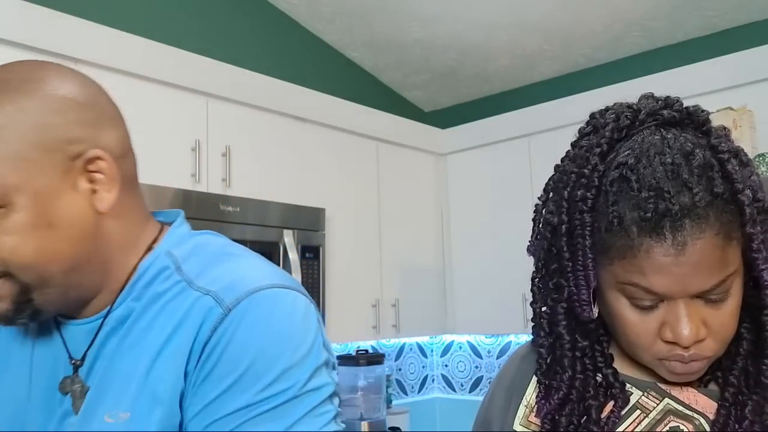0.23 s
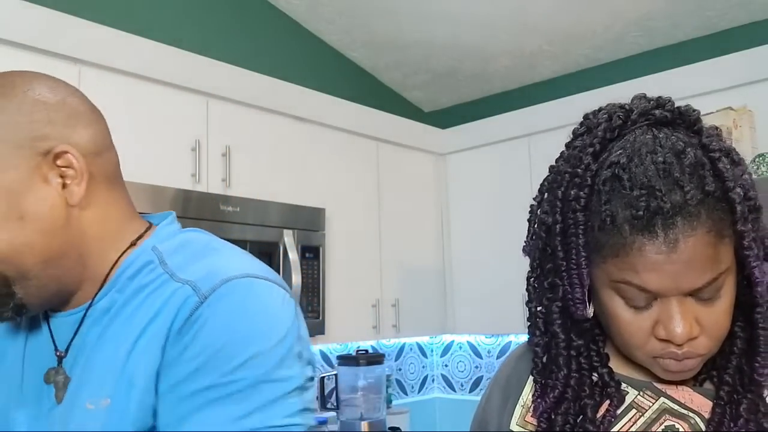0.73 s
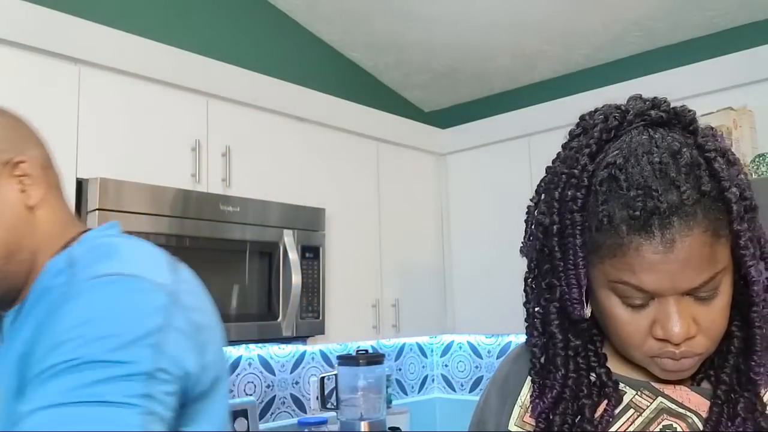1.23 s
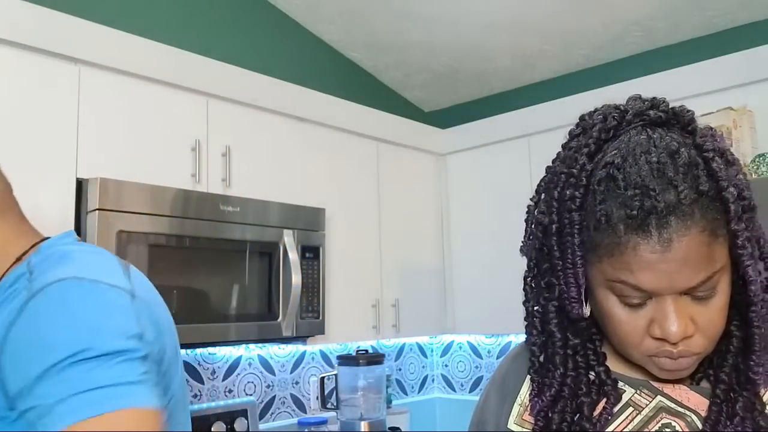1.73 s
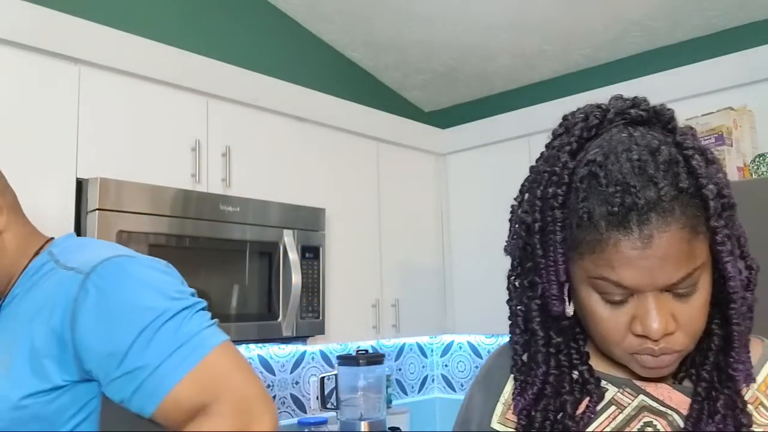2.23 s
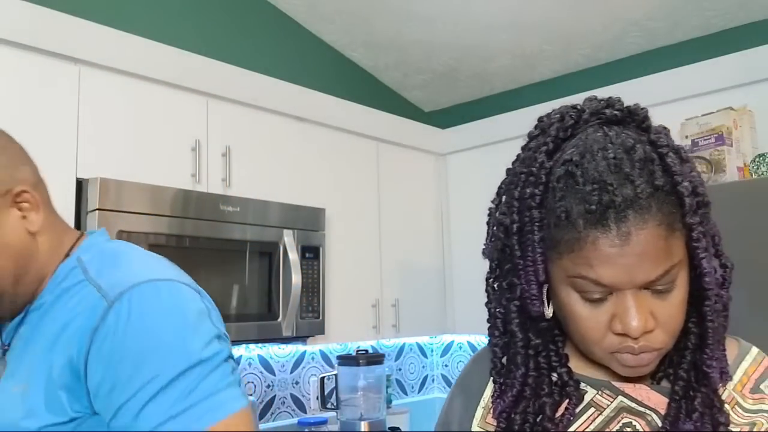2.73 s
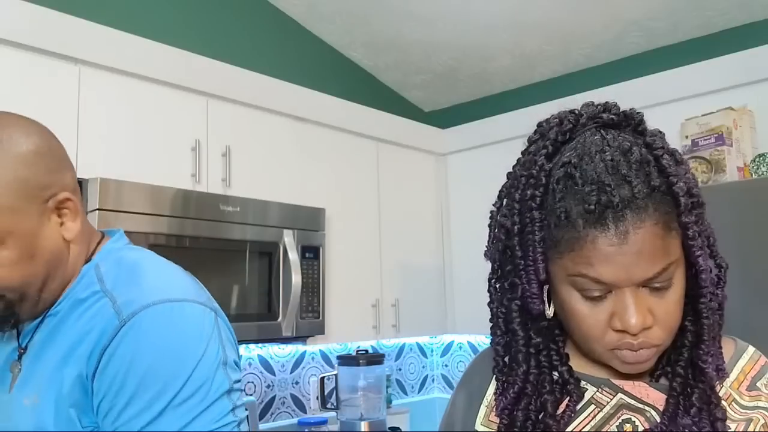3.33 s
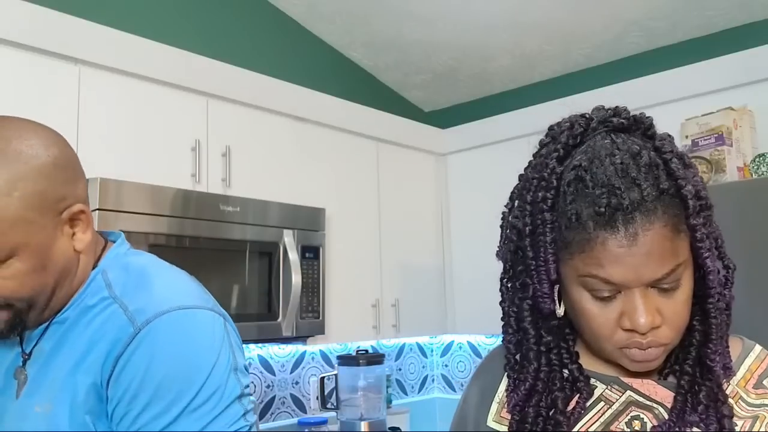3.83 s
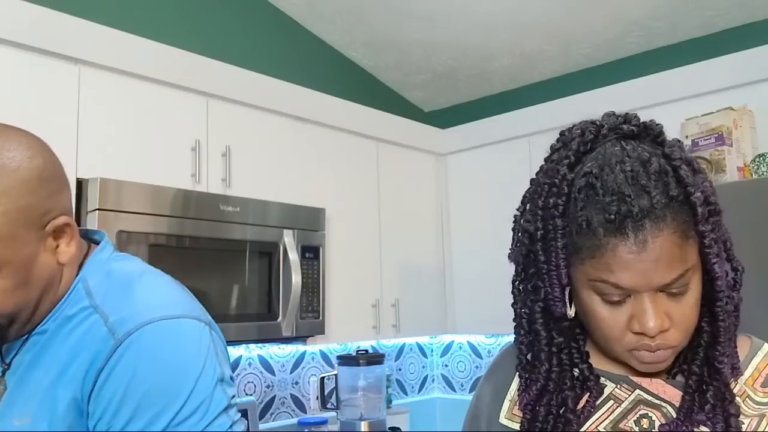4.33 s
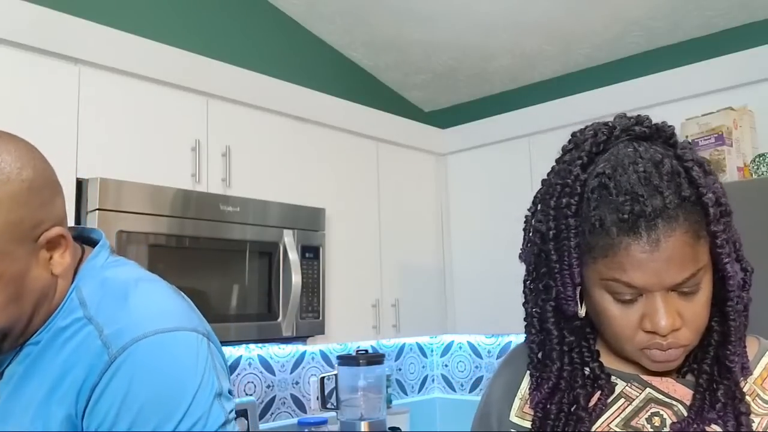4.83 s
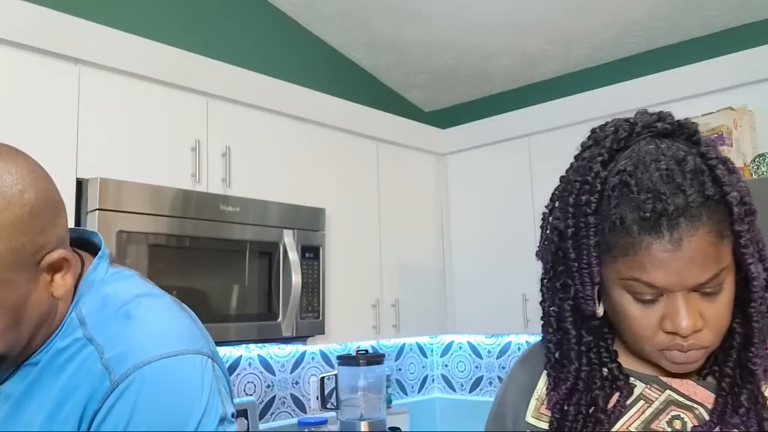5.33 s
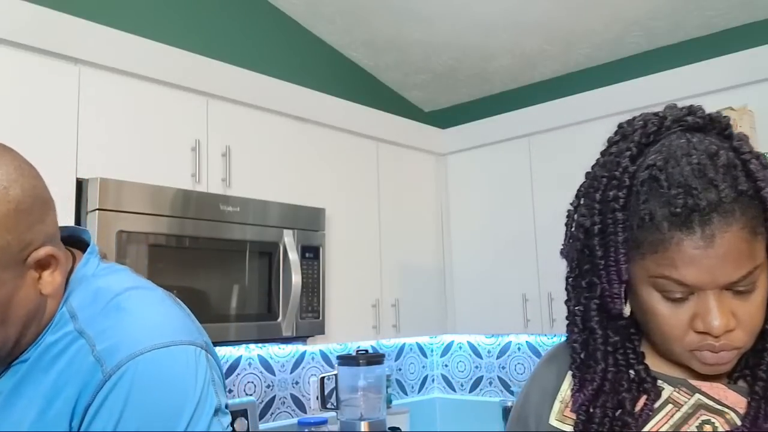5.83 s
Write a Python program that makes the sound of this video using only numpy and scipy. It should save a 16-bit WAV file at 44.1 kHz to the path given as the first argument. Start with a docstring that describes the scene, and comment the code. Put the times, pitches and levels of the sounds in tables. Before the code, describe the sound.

A close microphone in a reverberant kitchen, with a soft low appliance hum throughout. At about 0.25 s a knife is picked up: a quick cluster of small wooden knocks, a steely scuff and a light glassy clink, fading into faint hand rustle from 0.6 to 1.1 s. At 1.13 s a thin metal tray bangs down loudly on the counter, clattering and shimmering, with a smaller bounce at 1.38 s before it is damped. From 2.13 s a blade slides through firm rind with bright metallic hiss and a little crunch, hitting the board hard around 2.25 s and again at 2.32 s; a thin high ring lingers to about 2.8 s, with faint bumps. Very faint dish taps come at 2.9 and 3.6-3.8 s. From 4.6 s, quiet short sawing strokes rasp, growing slightly stronger after 5.3 s, with dull fruit bumps on the board, clearest at 5.8 s, until 6 s.

```python
"""A knife is picked up, a thin metal tray bangs down and rattles, then the blade slides through firm rind onto the board.
Later the blade saws in short strokes and fruit bumps the board; glassy dishes are tapped, appliances hum softly.
Blows ring decaying modes of board, tray and dishes; random clicks keep tray and steel ringing.
Coloured clicks make hiss and crunch, filtered noise the hum; a noise tail gives the room."""
import sys
import numpy as np
from scipy import signal
from scipy.fft import rfft, irfft
from scipy.io import wavfile

SR = 44100
rng = np.random.default_rng(int(sys.argv[2]) if len(sys.argv) > 2 else 0)


def to_linear_factor(level_db):
    """Convert decibel levels (scalar or array-like) to linear amplitude factors."""
    exponent = np.asarray(level_db, float) / 20
    return 10 ** exponent


def pcm_store(signal):
    """Save signal as 16-bit PCM."""
    levels = np.round(np.clip(np.atleast_2d(signal), -1, 1) * 32767)
    wavfile.write(sys.argv[1], SR, levels.astype(np.int16).T)


N = 268745


def level_in_time(rows):
    """A (time, level) table read at every sample; silent outside the rows."""
    time_s, level_db = np.transpose(rows)
    return np.interp(np.arange(N) / SR, time_s, level_db, -150, -150)


def at_hz(points, hz):
    """A table read on a log-frequency axis."""
    table_hz, value = np.transpose(points)
    return np.interp(np.log(hz + 1), np.log(table_hz), value)


def rms_one(x):
    """Scales to rms 1."""
    return x / np.sqrt(np.mean(x ** 2) + 1e-20)


def colour(x, spectrum):
    """Filters a noise by the spectrum; rms 1."""
    hz = np.arange(len(x) // 2 + 1) * SR / len(x)
    return rms_one(irfft(rfft(x) * to_linear_factor(at_hz(spectrum, hz)), len(x)))


def drift(rate_hz):
    """Slow random curve of rms 1: noise through a two-pole low-pass, computed every 40 samples."""
    r = np.exp(-2 * np.pi * rate_hz * 40 / SR)
    noise = rng.standard_normal(N // 40 + 2002)
    slow = signal.lfilter([1], [1, -2 * r, r * r], noise)[2000:]
    return np.interp(np.arange(N) / 40, np.arange(len(slow)), rms_one(slow))


def grains(per_s, spread_db):
    """Random clicks of uneven size and either sign; rms 1."""
    size_db = spread_db * np.minimum(rng.exponential(1, N), 5)
    clicks = to_linear_factor(size_db) * rng.choice([-1, 1], N)
    return rms_one(clicks * (rng.random(N) < per_s / SR))


def ring(force, hz, t60_s):
    """Resonator: a unit click sets off a decaying sine of height 1."""
    r, w = to_linear_factor(-60 / (t60_s * SR)), 2 * np.pi * hz / SR
    return signal.lfilter([0, np.sin(w)], [1, -2 * r * np.cos(w), r * r], force + 1e-18)


def strike(out, start_s, modes, peak_db, rise_s):
    """Adds one blow on a set of modes; a contact that takes time lets them swell."""
    hz, level_db, t60_s = np.transpose(modes)[:, :, None]
    start = round(start_s * SR)
    t = np.arange(min(N - start, int(SR * t60_s.max()))) / SR
    sign = (-1.) ** np.arange(len(hz))[:, None]
    partials = sign * to_linear_factor(level_db - 60 * t / t60_s) * np.sin(2 * np.pi * hz * t)
    sound = np.sum(partials, axis=0) * (1 - np.exp(-t / rise_s))
    sound *= to_linear_factor(peak_db) / np.abs(sound).max()
    return out + np.pad(sound, (start, N - start - len(t)))


def favour(hz, centre_hz, boost_db, octaves):
    """The place of a blow lifts the modes around one pitch."""
    return boost_db * np.exp(-(np.log2(hz / centre_hz) / octaves) ** 2)


def damped(from_s, t60_s):
    """Gain of the extra decay once a ringing thing is held or at rest."""
    return to_linear_factor(-60 * np.maximum(np.arange(N) / SR - from_s, 0) / t60_s)


def swell(loudest_s, rise_s, level_db, t60_s, hold_s=0):
    """Gain of one contact: a climb of 25 dB, even in dB, from the first touch, a hold, an even decay."""
    t = np.arange(N) / SR - loudest_s
    climb_db = 25 * np.minimum(t, 0) / max(rise_s, .001)
    decay_db = 60 * np.maximum(t - hold_s, 0) / max(t60_s, .02)
    return (t > -rise_s) * to_linear_factor(level_db + climb_db - decay_db)


def together(gains):
    """Contacts add by power."""
    return np.sqrt(np.sum(np.square(gains), axis=0))


def knocks():
    """Hard contacts reach the upper board modes, heavy ones shake the counter's lowest; faint bumps land softly."""
    # board and counter contacts: (time [s], peak before a 1.5 dB cut [dB], hardness [dB/octave],
    # weight on the counter [dB], favoured pitch [Hz])
    contacts = [(0.246, -22, 0.5, -3, 222), (0.268, -24.5, -10, -11.5, 226), (0.284, -23.5, 1, -15, 232),
                (0.299, -27.5, -3.5, 1.5, 234), (0.486, -41.5, -12, -19, 218), (1.132, -2, -4, -1.5, 194),
                (1.142, -9, 5, 6, 237), (1.382, -14.5, -5, -14, 330), (1.458, -24, -3, 2.5, 234),
                (1.507, -31, -5, 0, 268), (2.129, -26, 0.5, -10, 259), (2.183, -28, 11, -4, 460),
                (2.246, -4.5, 8, -6, 756), (2.253, -5.5, 4, -12, 357), (2.272, -13.5, 6, 0, 263),
                (2.289, -25, 9, -21, 455), (2.324, -17.5, 5.2, -1, 362), (2.808, -35, 0.5, -0.5, 463),
                (2.835, -37.5, 1, -2, 420), (2.861, -33, -1.5, -3.5, 268), (5.358, -35.5, 5, 10, 343),
                (5.699, -32, 1, 0, 249), (5.738, -37, -2.5, 7, 277), (5.821, -21.5, -1.5, -3.5, 448),
                (5.889, -32.5, 0, 3.5, 244), (5.905, -34.5, 3.5, 0, 460), (5.949, -42, -1, -3, 232),
                (6.012, -34.5, -4, 7, 232)]
    # board modes: (frequency [Hz], level [dB], t60 before stretching [s])
    board_modes = [(68, -21, 0.11), (122, -4.5, 0.12), (238.2, -2, 0.091), (288, -2, 0.064),
                   (357, -1.5, 0.052), (459.1, -1.5, .04), (577, -8, 0.053), (701, -7.5, .03),
                   (831.3, -12.5, 0.034), (960, -6, 0.017), (1174, -11, .025), (1335, -13.5, 0.018),
                   (1504, -15, 0.015), (1840, -18.5, 0.0143), (2340, -19.5, 0.01164)]
    out, (hz, level_db, t60_s) = np.zeros(N), np.transpose(board_modes)
    chances = rng.standard_normal((len(contacts), len(board_modes)))
    for (start_s, peak_db, hard_db, weight_db, centre_hz), chance in zip(contacts, chances):
        stretch = 1.3 * to_linear_factor(.25 * weight_db)      # heavy contacts ring longer
        blow_db = level_db + hard_db * np.log2(hz / 300) + weight_db * (hz < 200) + 1.7 * chance
        blow_db += favour(hz, centre_hz, boost_db=9.8, octaves=.3)
        rise_s = .0006 * to_linear_factor(-.5 * peak_db)
        out = strike(out, start_s, np.transpose([hz, blow_db, t60_s * stretch]), peak_db - 1.5, rise_s)
    return out


def tray():
    """Blows ring the sheet metal; while it chatters on the counter dense clicks keep feeding its modes."""
    # blows: (time [s], peak [dB], favoured pitch [Hz])
    blows = [(1.132, -18.5, 280), (1.141, -10.5, 1168), (1.16, -15.5, 2140), (1.189, -26, 600),
             (1.2, -18, 1168), (1.383, -28, 340)]
    # tray modes: (frequency [Hz], level [dB], t60 before capping [s])
    tray_modes = [(126, -14, 0.29), (226, -4, 0.9), (343, 1.5, 0.98), (490, -16.5, 0.49), (553, -6, 0.24),
                  (705, -18, 0.25), (1000, -29, 5.0), (967, -19, 0.17), (1037, -18.5, 0.48),
                  (1168, -11.5, 0.24), (1325, -15, 0.6), (1678, -10, 0.24), (1776, -14, 0.73),
                  (2047, -9.5, 0.65), (2135, -8, 0.9), (2186, -10, 0.65), (2236, -13, 0.68),
                  (2333, -19, 0.99), (2564, -15, 0.15), (2620, -30.5, 5.0), (3420, -30.5, 1.5),
                  (4030, -25.5, 2.2), (3962, -26, 3.0), (4043, -18.5, 0.5), (4807, -23, 0.6),
                  (5350, -39.5, 5.0)]
    # chatter of the sheet: (loudest [s], rise [s], level [dB], hold [s], t60 [s])
    chatter_row = (1.165, .03, -27.5, .09, .5)
    # buzz of the rim while it touches: (loudest [s], rise [s], level [dB], hold [s], t60 [s])
    rim_row = (1.18, .035, -36.5, .075, .12)
    # unpitched clatter: (loudest [s], rise [s], level [dB], hold [s], t60 [s])
    clatter_row = (1.154, .02, -33, .07, .9)
    # the base takes the first bounce: (loudest [s], rise [s], level [dB], t60 [s])
    landing_row = (1.15, .012, -15.5, .12)
    # clatter spectrum: (frequency [Hz], level [dB])
    clatter_spectrum = [(600, -24), (1000, -6), (1500, -3), (2200, -5), (2900, -2), (3800, -7), (5000, -4),
                        (9000, -20), (14000, -40)]
    rest_s, rest_t60_s, settle_t60_s = 1.41, 0.13, .6      # the tray comes to rest and stops ringing

    out, (hz, level_db, t60_s) = np.zeros(N), np.transpose(tray_modes)
    t60_s = np.minimum(t60_s, np.minimum(.9, 330 / hz + 0.098))      # upper modes lose more to the counter
    chances = rng.standard_normal((len(blows), len(tray_modes)))
    for (start_s, peak_db, centre_hz), chance in zip(blows, chances):
        blow_db = level_db - 1.7 * np.log2(hz / 300) + 2 * chance
        blow_db += favour(hz, centre_hz, boost_db=18.0, octaves=0.13)
        out = strike(out, start_s, np.transpose([hz, blow_db, t60_s]), peak_db, rise_s=0.006)
    wobble = to_linear_factor(1.6 * drift(29.99))      # the tray rocks, its ring flutters

    clicks = grains(2500, 3.5)
    rings = np.array([to_linear_factor(db) * rms_one(ring(clicks, f, .08 if f < 3500 else .035))
                      for f, db in zip(hz, level_db)])
    base, sheet, rim = [rms_one(rings[(hz > low) & (hz <= high)].sum(axis=0))
                        for low, high in [(900, 1400), (1400, 3500), (3500, 7000)]]
    shake, buzz, scatter = [swell(loudest_s, rise_s, db, dying_s, hold_s)
                            for loudest_s, rise_s, db, hold_s, dying_s in (chatter_row, rim_row, clatter_row)]
    base_gain = together([to_linear_factor(-5) * shake, swell(*landing_row)])
    chatter = shake * sheet + buzz * rim + base_gain * base
    clatter = scatter * damped(rest_s, settle_t60_s) * colour(clicks, clatter_spectrum)
    return (out * wobble + chatter) * damped(rest_s, rest_t60_s) + clatter


def blade():
    """Friction grains keep the steel's modes ringing; each flutters as the blade turns in the room."""
    # steel dragged over an edge, push by push: (loudest [s], rise [s], ringing drive [dB], t60 [s],
    # crunch re drive [dB])
    slides = [(.44, .04, -68, 0.36, 1.5), (2.134, .009, -27, .22, -8), (2.195, .05, -27, 0.28, -11),
              (2.25, .08, -25, .4, -10), (2.305, .07, -18.5, 0.21, -20), (2.36, .1, -30, .35, -9),
              (2.45, .1, -43, .3, -14)]
    # steel modes, only relative levels count: (frequency [Hz], level [dB])
    steel_modes = [(3677, -42), (4420, -46), (5426, -50), (5674, -45), (5825, -43), (7822, -51),
                   (8220, -42), (8452, -45), (9405, -53), (9695, -51), (9825, -43), (10099, -43),
                   (10277, -50), (10519, -47), (11149, -53), (11682, -37), (11763, -44), (11956, -45),
                   (12258, -49), (12452, -49), (12645, -48), (12893, -49), (13098, -49), (13248, -49),
                   (13469, -50), (13598, -51), (13819, -49), (14093, -49), (14616, -49), (14939, -50)]
    # a touch sets one free mode singing: (time [s], peak before flutter [dB], frequency [Hz], t60 [s])
    pings = [(.425, -64.5, 4440, 0.38), (.44, -68, 3661, .3), (.65, -81, 2700, 2.5),
             (2.133, -39, 6966, .15), (2.27, -41, 4421, .3), (2.395, -39, 4425, 0.47),
             (2.51, -41.5, 4425, 0.37), (2.66, -62, 4425, .8), (2.78, -64.5, 4425, 0.57),
             (4.587, -76, 8700, .3)]
    # friction hiss spectrum: (frequency [Hz], level [dB])
    hiss_spectrum = [(1470, -41), (2500, -14), (3100, -24.5), (3620, -1), (3940, -10), (4570, -0.5),
                     (5170, -11.5), (5760, -3), (7430, -12), (8350, -1), (9020, -15.5), (9740, -7.5),
                     (11500, -2), (13500, 3), (15800, 2)]
    # rind crunch spectrum: (frequency [Hz], level [dB])
    crunch_spectrum = [(350, -33), (600, -4.5), (901, -2.5), (1230, -6), (2500, -18), (2700, -18),
                       (3300, -20), (4290, -42.5), (7260, -120)]
    hiss_db, cycles_to_60_db = -1.5, 680      # hiss re drive; cycles until a mode has lost 60 dB

    pushes = [swell(loudest_s, rise_s, db, t60_s) * to_linear_factor(np.array([[0], [hiss_db], [crunch_db]]))
              for loudest_s, rise_s, db, t60_s, crunch_db in slides]
    drive, hiss, crunch = together(pushes) * to_linear_factor(2.0 * drift(30))
    friction = grains(12000, 2.5)
    top_db = max(db for _, db in steel_modes)
    ringing = 0
    for hz, level_db in steel_modes:
        t60_s = cycles_to_60_db / hz
        steady = np.sqrt(4 * np.log(1000) / (t60_s * SR))      # steady rubbing gives rms 1
        flutter = to_linear_factor(2.5 * drift(18))
        ringing = ringing + to_linear_factor(level_db - top_db - 8.0) * steady * flutter * ring(drive * friction, hz, t60_s)
    singing = np.zeros(N)
    for start_s, peak_db, hz, t60_s in pings:
        singing = strike(singing, start_s, [(hz, 0, t60_s)], peak_db, rise_s=.008)
    singing = singing * to_linear_factor(3.1 * drift(34))
    rind = colour(grains(5000, 2.5), crunch_spectrum)
    return ringing + singing + hiss * colour(friction, hiss_spectrum) + crunch * rind


def rubbing():
    """Fine grains hiss, coarser ones crunch in the rind; after a scuff the top dies first, the crunch last."""
    # sudden scuffs of steel, tray and fruit: (time [s], hiss before a 3 dB cut [dB], hiss t60 [s],
    # top re hiss [dB], crunch re uncut hiss [dB])
    scuff_rows = [(.247, -37, 0.31, -4.5, -7), (.345, -52, 0.34, -4, -10), (.375, -54, .1, -9, -10),
                  (.43, -63, 0.35, 8, 9), (.488, -57.5, .08, -14, 6), (.624, -59.5, .1, -8, -14),
                  (.681, -61, .1, -6, -8), (.975, -66, 0.34, -4, -3), (1.073, -64, 0.21, -6, -20),
                  (1.134, -27.5, 0.074, -4.5, -10), (1.15, -38, 0.49, -12, -4), (1.318, -36, 0.21, 0, -12),
                  (1.36, -47, .2, 5, -10), (1.385, -37, .36, 5, -8), (1.625, -64, .1, 2, -10),
                  (2.825, -65.5, .2, -2.5, 7), (2.9, -64, .45, 6, 3), (4.585, -82, .3, 12.5, -15),
                  (5.335, -65.5, .1, 0, 9), (5.993, -53.5, .1, 3, -1)]
    # sawing strokes in the rind: (full pressure [s], hold [s], hiss before a 3 dB cut [dB],
    # top re hiss [dB], crunch re uncut hiss [dB])
    stroke_rows = [(2.5, .13, -62, -20, -12), (2.68, .1, -75, -8, -4), (2.801, 0.1, -76, -1, 13.5),
                   (4.66, .03, -76.5, 13, -15), (4.74, .04, -78, 13, -4), (4.82, .04, -86, -9, 10),
                   (4.95, .09, -74.5, 14.5, -2), (4.988, 0.062, -71, 12.5, 2), (5.04, .045, -66, 0, 2.5),
                   (5.349, 0.049, -59, 5.5, 6), (5.65, .02, -73.5, 4.5, -3.5), (5.687, .055, -62.5, 6.5, 5),
                   (5.8, .15, -75, -10, 9.5), (6.013, .02, -57, 6, 1.5), (6.045, .05, -61, -6, 4)]
    # a hand moves over the counter: (time [s], level before the hiss's 3 dB cut [dB])
    rustle_rows = [(.62, -74), (.72, -70), (.8, -73), (.86, -72), (.92, -78), (.98, -72), (1.04, -76),
                   (1.12, -75)]
    # hiss spectrum: (frequency [Hz], level [dB])
    hiss_spectrum = [(2470, -35), (4200, -6.5), (4470, -2), (5300, 2), (6730, 1.5), (8140, 4.5),
                     (8890, -1.5), (10800, 2), (11500, -4.5), (15000, -30), (22000, -120)]
    # spectrum of the top of the hiss: (frequency [Hz], level [dB])
    top_spectrum = [(6470, -30), (11000, -3), (11400, -2.5), (12400, -5), (15200, -4), (15800, -4)]
    # dull crunch spectrum: (frequency [Hz], level [dB])
    crunch_spectrum = [(350, -33), (600, 1.5), (862, -12), (1000, -6), (1500, -7), (1810, -4),
                       (2290, -13.5), (2830, -12), (3080, -17), (3380, -15.5), (4500, -18.5), (5850, -41.5),
                       (9900, -120)]
    scuff_rise_s, stroke_rise_s, stroke_t60_s = .004, .03, .2
    after_db, after_t60_s = -14, 1.4      # wet fibres go on crackling after a stroke

    scuffs = [[swell(start_s, scuff_rise_s, db, t60_s),
               swell(start_s, scuff_rise_s, db + top_db, t60_s * .85),
               swell(start_s, scuff_rise_s, db + crunch_db, t60_s * 2)]
              for start_s, db, t60_s, top_db, crunch_db in scuff_rows]
    strokes = []
    for full_s, hold_s, db, top_db, crunch_db in stroke_rows:
        gain = swell(full_s, stroke_rise_s, db, stroke_t60_s, hold_s)
        gain = gain + swell(full_s, stroke_rise_s, db + after_db, after_t60_s, hold_s)
        strokes.append(gain * to_linear_factor(np.array([[0], [top_db], [crunch_db]])))
    rustle_db = level_in_time(rustle_rows) + 1.5 * drift(12)
    rustle = to_linear_factor(rustle_db + np.array([[0], [-4], [0.0]]))
    hiss, top, crunch = together([*scuffs, *strokes, rustle])
    fine, coarse = grains(14000, 1.1), grains(5000, 2.5)
    hissing = hiss * colour(fine, hiss_spectrum) + top * colour(fine, top_spectrum)
    crunching = crunch * colour(coarse, crunch_spectrum)
    return to_linear_factor(2.2 * drift(22) - 3.0) * hissing + to_linear_factor(1.5 * drift(20)) * crunching


def dish():
    """Two partials, at a pitch of their own from piece to piece; the dish rocks, so its ring flutters."""
    # light taps on glassy dishes: (time [s], peak before a 3.5 dB cut [dB], pitch [Hz],
    # overtone re pitch [dB], t60 [s])
    taps = [(0.247, -28, 1470, -12, .3), (0.298, -33, 1461, -12, 0.23), (0.392, -40.5, 1466, -14, .5),
            (0.4894, -56, 1466, -12, .7), (2.9014, -50.5, 1536, -3, 0.2), (3.5834, -61, 1540, -4, .22),
            (3.6094, -62.5, 1546, -4, .22), (3.7894, -69, 1577, 0, .2)]
    out = np.zeros(N)
    for start_s, peak_db, hz, overtone_db, t60_s in taps:
        partials = [(hz, 0, t60_s), (hz * 1.66, overtone_db, t60_s * 0.398)]
        out = strike(out, start_s, partials, peak_db - 3.5, rise_s=0.0034)
    return out * to_linear_factor(1.4 * drift(33))


def hum():
    """Low appliance rumble: filtered noise that wavers a little."""
    # hum spectrum: (frequency [Hz], level [dB])
    hum_spectrum = [(18, -63), (30, -34.5), (53, -15.5), (88, -22.5), (121, -5), (199, -18.5), (221, -2.5),
                    (287, -3), (394, -7), (584, -17), (1190, -27.5), (1760, -43), (6900, -54), (8300, -45),
                    (16000, -52.5)]
    # hum level before wavering: (time [s], level [dB])
    hum_level = [(0, -54), (1, -55), (2, -55), (3.2, -57.5), (3.7, -54.5), (4.6, -54.5), (5, -52),
                 (5.6, -55), (6.1, -50.5)]
    return to_linear_factor(level_in_time(hum_level) + 1.2 * drift(3)) * colour(rng.standard_normal(N), hum_spectrum)


def kitchen(x):
    """Hard walls: octave bands of noise, each dying at its own rate, building up over the first reflections."""
    # reverberation: (frequency [Hz], t60 [s])
    room_t60 = [(100, 0.44), (300, .55), (1000, .58), (4000, 0.44), (12000, 0.24)]
    t = np.arange(SR) / SR
    tail = 0
    for hz in 62.5 * 2. ** np.arange(9):
        edges_hz = [hz / np.sqrt(2), min(hz * np.sqrt(2), 20000)]
        band = signal.butter(2, edges_hz, "band", fs=SR, output="sos")
        tail = tail + signal.sosfilt(band, rng.standard_normal(SR)) * to_linear_factor(-60 * t / at_hz(room_t60, hz))
    tail *= np.clip((t - .003) / 0.0042, 0, 1)
    return signal.fftconvolve(x, tail / np.sqrt(np.sum(tail ** 2)))[:N]


def scene():
    """All sources at one microphone; the room answers all but the hum."""
    near, rubs = knocks() + tray() + dish() + blade(), rubbing()
    room = to_linear_factor(-6.0) * kitchen(near + to_linear_factor(-6.0) * rubs)
    return (near + rubs + room + hum())[None]


def low_pass(x):
    """Removes everything above the highest recorded frequency."""
    return signal.sosfilt(signal.butter(12, 16640, fs=SR, output="sos"), x)


def record(dry):
    """The microphone drops the deep bass; a steep low-pass cuts the top."""
    mic = signal.sosfilt(signal.butter(3, 50, "high", fs=SR, output="sos"), dry)
    mic = signal.sosfilt(signal.ellip(10, 1, 60, 16050, fs=SR, output="sos"), mic)
    return low_pass(mic)


dry = scene()
out = record(dry)
pcm_store(out)
```